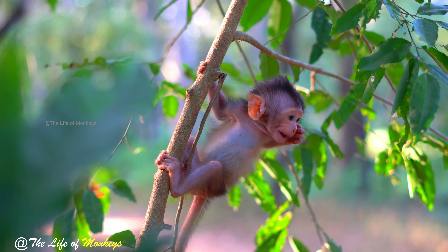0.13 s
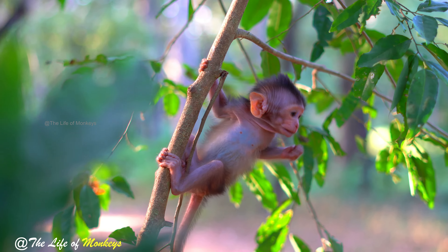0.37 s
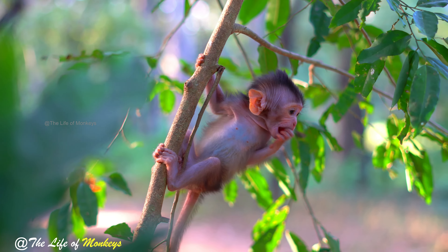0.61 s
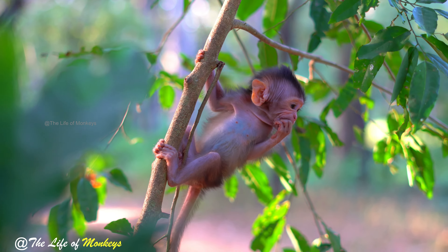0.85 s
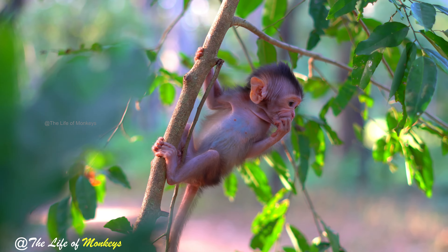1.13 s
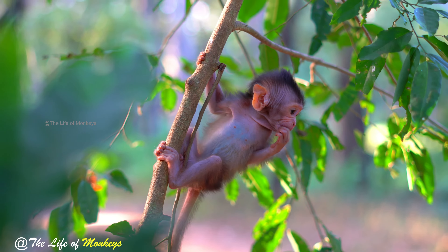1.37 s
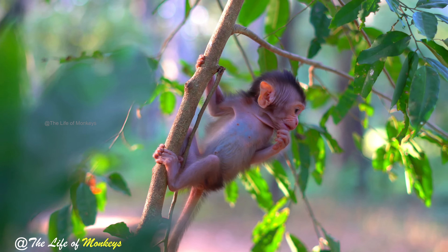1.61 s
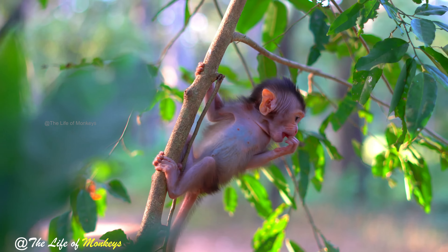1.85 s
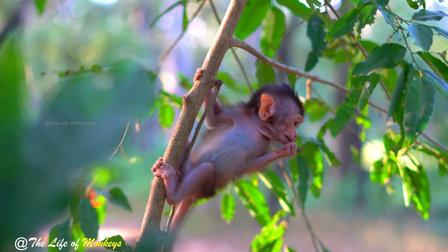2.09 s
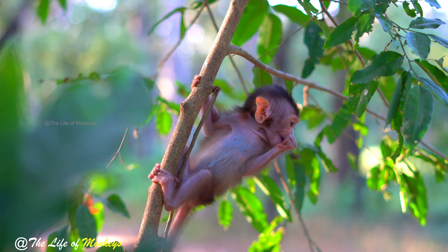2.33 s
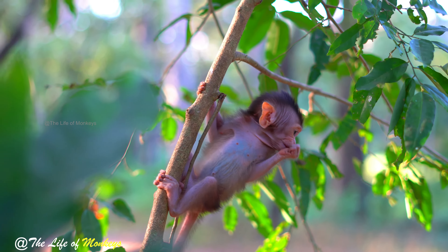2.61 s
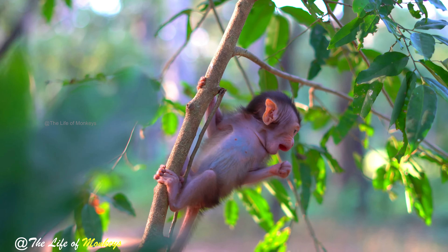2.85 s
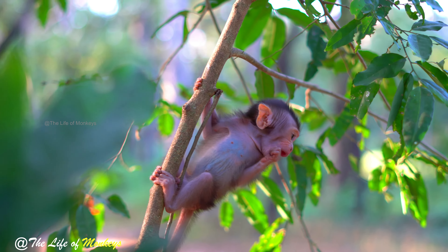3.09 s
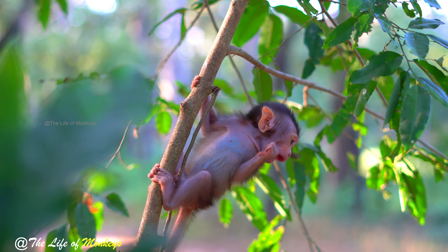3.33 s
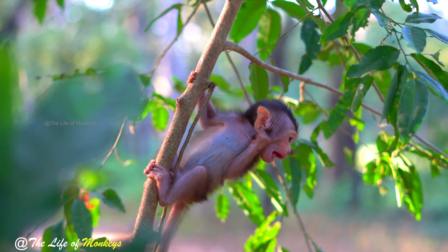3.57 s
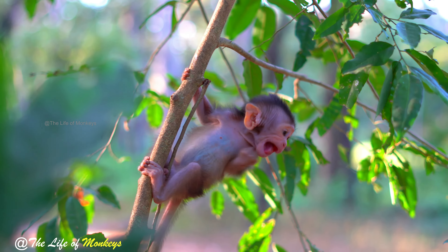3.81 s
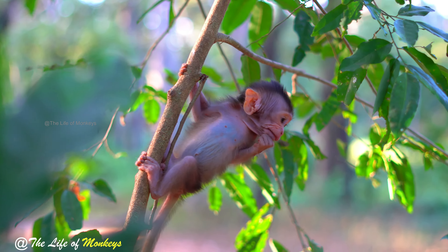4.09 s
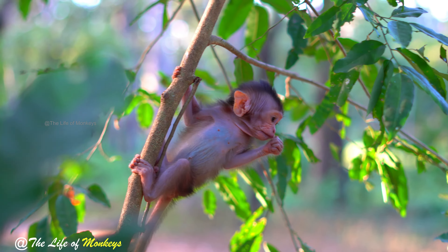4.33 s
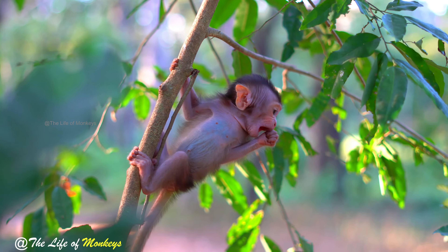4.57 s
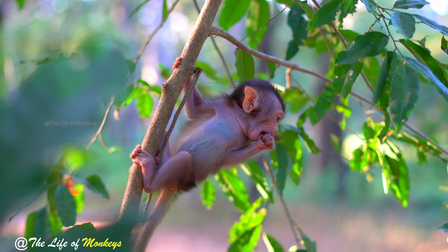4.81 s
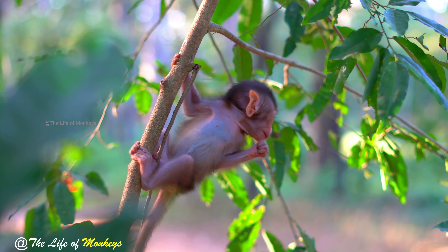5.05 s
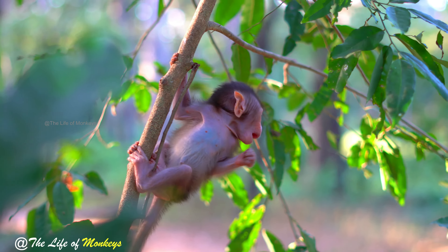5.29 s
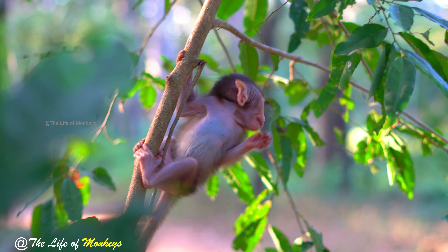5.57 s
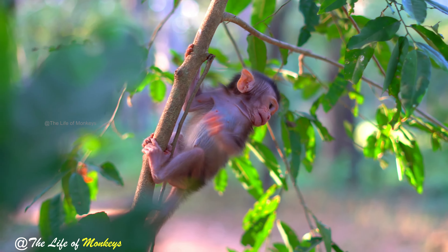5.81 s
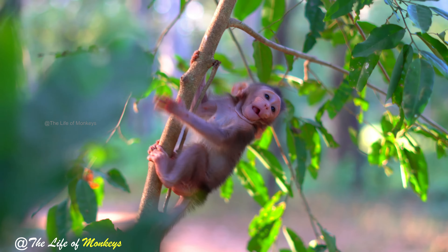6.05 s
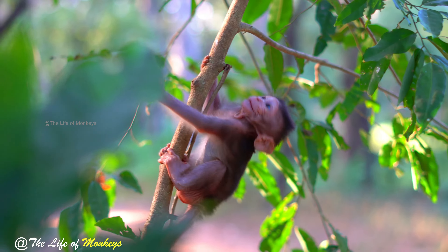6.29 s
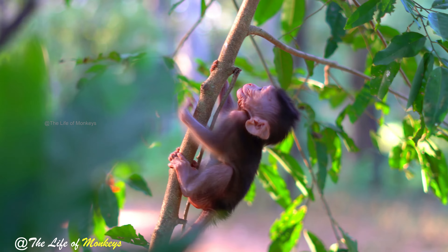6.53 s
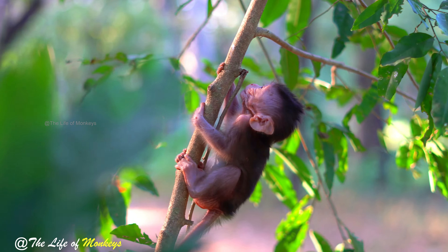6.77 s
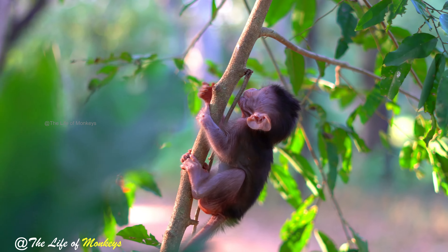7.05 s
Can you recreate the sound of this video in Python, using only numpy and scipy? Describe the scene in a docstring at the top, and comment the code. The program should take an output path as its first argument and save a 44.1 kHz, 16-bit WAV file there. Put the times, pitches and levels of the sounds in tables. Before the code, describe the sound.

Outdoors in a forest, two cicadas sing throughout with a steady, shrill, metallic drone, one clearly left, one nearer the middle. Their tones throb in short pumps and twice per roughly one-second figure flare brighter. A blurred far chorus and low airy rumble lie beneath. In the first half, leaves rustle softly and twigs tick as a small animal moves; a faint hoot and one tiny chirp pass. Stereo microphone at some distance, with woodland echoes.

```python
"""Two cicadas drone in a forest, each a train of some 543 clicks a second built from its overtones. Each repeats
a figure: the pitch rises and sags, the tone swells in short pumps, and twice the bright overtones flare.
A far chorus of noise humps and an airy rumble of shaped noise lie under them; leaf rustles are clumps
of grains, twig ticks short damped rings, a faint hoot and one small chirp gliding sines."""
import sys
import numpy as np
from scipy import signal
from scipy.fft import rfft, irfft, next_fast_len
from scipy.io import wavfile

SR = 44100
rng = np.random.default_rng(int(sys.argv[2]) if len(sys.argv) > 2 else 0)


def voltage_ratio(decibels):
    """Convert decibels (scalar or array-like) to amplitude ratios, 20 dB per decade."""
    exponent = np.asarray(decibels, float) / 20
    return 10 ** exponent


def waveform_to_disk(signal):
    """Save audio, clipped to [-1, 1], as 16-bit WAV at the path in sys.argv[1]."""
    frames = np.transpose(np.atleast_2d(signal))
    scaled = np.clip(frames, -1, 1) * 32767
    samples = np.round(scaled).astype(np.int16)
    wavfile.write(sys.argv[1], SR, samples)


N = 315756   # samples in the scene


def at_hz(points, hz, axis=1):
    """A column of a table, read on a log-frequency axis."""
    points = np.array(points)
    return np.interp(np.log(hz), np.log(points[:, 0]), points[:, axis])


def pan(sound, left_right_db):
    """One sound placed between the sides; positive dB leans left."""
    return sound * voltage_ratio([[left_right_db / 2], [-left_right_db / 2]])


def drift(rate_hz, size):
    """Random wander of spread 1: white noise smoothed by two equal low-pass poles at rate_hz."""
    knot_rate = 400   # knots per second
    knots = rng.standard_normal(int(size / SR * knot_rate))
    pole = np.exp(-2 * np.pi * rate_hz / knot_rate)
    slow = signal.lfilter([1], [1, -2 * pole, pole * pole], knots)
    return np.interp(np.arange(size) * knot_rate / SR, np.arange(len(slow)), slow / slow.std())


def coloured(gain):
    """Stereo noise of rms 1 with the given gain per frequency; the two sides agree most in the bass."""
    # left-right likeness of the noise: (f/Hz, likeness from 0 to 1)
    side_likeness = [(60, 0.99), (130, 0.98), (290, 0.67), (640, 0.22), (1410, 0.51), (3100, 0.1),
                     (15000, 0.14)]
    hz = np.maximum(np.arange(len(gain)) * SR / N, 1)
    alike = np.clip(at_hz(side_likeness, hz), 0, 1)
    mid, side = rfft(rng.standard_normal((2, N))) * gain * np.sqrt([1 + alike, 1 - alike])
    noise = irfft([mid + side, mid - side], N)
    return noise / noise.std()


def glide(rows, wobble_hz):
    """A sine that follows rows of (t/s, f/Hz, level/dB), its pitch trembling, and is silent outside them."""
    times, hz, db = np.transpose(rows)
    t = np.arange(N) / SR
    pitch = np.interp(t, times, hz) + wobble_hz * drift(8.2, N)
    phase = 2 * np.pi * np.cumsum(pitch) / SR
    return voltage_ratio(np.interp(t, times, db, -200, -200)) * np.sqrt(2) * np.sin(phase)


def swells(share, rows, rest_db):
    """Gain over one figure: bells (share of the figure, level/dB, spread as share) on a resting level."""
    places = np.arange(400) / 400
    gain = voltage_ratio(rest_db)
    for at, db, spread in rows:
        distance = (places - at + .5) % 1 - .5   # the figure closes on itself
        gain = gain + voltage_ratio(db) * np.exp(-.5 * (distance / spread) ** 2)
    return np.interp(share, places, gain, period=1)


def through_forest(voice, singer, left_lag_us, run_in):
    """Adds to the straight sound a decaying scatter from trunks and leaves, both in the singer's colour."""
    # brightness of the scatter: (f/Hz, echo level re straight sound/dB)
    echo_colour = [(2700, 0), (5400, 1), (8000, 1), (11000, -0.5), (19000, -9)]
    t60_s, echo_left_db = 0.91, 7.5   # the echoes come mostly from the left
    size = next_fast_len(len(voice) + SR)
    hz = np.maximum(np.arange(size // 2 + 1) * SR / size, 1)
    lag = np.arange(SR) / SR
    scatter = rng.standard_normal((2, SR)) * voltage_ratio(-60 * lag / t60_s) * np.minimum(lag / 0.03, 1)
    scatter /= np.sqrt((scatter ** 2).sum(axis=1, keepdims=True))
    straight = voltage_ratio(np.outer([.5, -.5], at_hz(singer, hz, axis=2)))
    straight = straight * np.exp(-2j * np.pi * np.outer([left_lag_us / 10 ** 6, 0], hz))
    echo = pan(voltage_ratio(at_hz(echo_colour, hz)) * rfft(scatter, size), echo_left_db)
    heard = rfft(voice, size) * voltage_ratio(at_hz(singer, hz)) * (straight + echo)
    return irfft(heard, size)[:, run_in:run_in + N]


def cicada(pitch, pumps, flares, starts, singer, jitter_hz, rest_db, low_follows, treble_swing, left_lag_us):
    """Sums the overtones of one click train; pumps and flares move groups of overtones by different amounts."""
    # every fifth overtone is strong, as five ribs buckle per click: (multiple of click rate, relative level/dB)
    overtones = [(4, -37.5), (5, -7), (5.5, -30.5), (6, -27.5), (6.5, -45), (7, -35.5), (8, -32),
                 (9, -32.5), (10, -2), (10.5, -33.5), (11, -20.5), (11.5, -40), (12, -25), (12.5, -37),
                 (13, -28), (13.5, -57), (14, -27), (15, -9.5), (15.5, -33), (16, -24), (16.5, -47),
                 (17, -29), (18, -34), (19, -30), (20, -14), (20.5, -39), (21, -29.5), (22, -35), (23, -34),
                 (24, -35), (25, -21.5), (26, -32), (27, -39), (29, -33), (30, -9), (31, -33), (34, -26),
                 (35, -10.5)]
    # effort of either singer: (t/s, gain/dB)
    effort = [(0, -2), (.7, -0.86), (1.8, -0.5), (2.6, -2), (3.3, -1.5), (4.2, -1.1), (5.5, -0.5),
              (7.2, -0.8)]
    click_hz = 543
    pump_spread = 0.023   # share of the figure
    run_in = SR   # samples sung before the start, so that the echoes are built up
    t = np.arange(-run_in, N) / SR
    share = np.interp(t, starts, np.arange(len(starts))) % 1
    offset = np.interp(share, *np.transpose(pitch), period=1)
    pump = swells(share, [(at, db, pump_spread) for at, db in pumps], rest_db)
    flare = swells(share, flares, rest_db=-29)
    click_rate = click_hz + offset + jitter_hz * drift(23.93, len(t))
    phase = 2 * np.pi * np.cumsum(click_rate) / SR

    low, middle, upper, high, top = groups = np.zeros((5, len(t)))
    for (order, db), turn in zip(overtones, rng.uniform(0, 2 * np.pi, 64)):
        group = np.searchsorted([8, 13, 18, 28], order, side="right")
        groups[group] += voltage_ratio(db) * np.cos(order * phase + turn)
    # the pumps move the low overtones less than the middle ones; the flares move the higher groups
    voice = low * pump ** low_follows + middle * pump + upper * flare ** 0.39
    voice += high * flare ** treble_swing + top * flare ** 0.51
    voice *= voltage_ratio(np.interp(t, *np.transpose(effort)))
    return through_forest(voice, singer, left_lag_us, run_in)


def left_cicada():
    """A singer on the left whose click-train figure returns at an even pace."""
    # click rate through one figure: (share of the figure, offset/Hz)
    left_pitch = [(.04, 4), (.13, 1), (.17, 1.74), (.28, -2), (.35, 3), (.47, -1.5), (.67, 4), (.79, 0.24),
                  (.865, 5), (.95, 1.28)]
    # pumps that swell the tone: (share of the figure, level/dB)
    left_pumps = [(0.038, -0.5), (.165, -18), (.365, -6.8), (0.549, -6), (0.669, -3.2), (.875, -4.1)]
    # flares of the treble: (share of the figure, level/dB, spread as share)
    left_flares = [(.09, -17, 0.033), (.265, 5, 0.035), (.42, -22, .02), (.76, 8.5, 0.034)]
    # colour and place: (f/Hz, level/dB, left-right of the straight sound/dB)
    left_singer = [(2690, -26, 20.5), (5530, -20.5, 21.5), (7100, -26, 0), (11300, -29.5, 20.5),
                   (19000, -20.5, 2)]
    start_s, period_s = .015, .954
    starts = start_s + period_s * np.arange(-2, 10)
    return cicada(left_pitch, left_pumps, left_flares, starts, left_singer, jitter_hz=0.33, rest_db=-13,
                  low_follows=0.17, treble_swing=0.72, left_lag_us=41.0)


def front_cicada():
    """A singer nearer the middle whose click-train figure is shorter and slightly uneven in length."""
    # times at which the figure begins again: t/s
    front_starts = [-.799, -.115, .569, 1.268, 1.957, 2.646, 3.285, 3.964, 4.653, 5.347, 6.051, 6.745,
                    7.429]
    # click rate through one figure: (share of the figure, offset/Hz)
    front_pitch = [(.02, 2.5), (.14, -1.84), (.29, -3), (.38, -0.49), (.5, -1.62), (.63, -4), (.75, -4.5),
                   (.83, -6.5), (.9, -1.5)]
    # pumps that swell the tone: (share of the figure, level/dB)
    front_pumps = [(.005, 1), (.22, 5.3), (.36, 5.9), (.495, 4.8), (.59, 1.1), (0.669, 0.73), (.815, 5.1),
                   (.92, 5.1)]
    # flares of the treble: (share of the figure, level/dB, spread as share)
    front_flares = [(0.051, 3, 0.052), (.19, -5, 0.054), (.38, -11, 0.062), (0.567, 7.5, 0.038),
                    (.85, -16, 0.081)]
    # colour and place: (f/Hz, level/dB, left-right of the straight sound/dB)
    front_singer = [(2750, -31, 10.4), (5490, -30, 7.3), (7700, -22, 4.1), (11400, -22, 5.9),
                    (19000, -23, 4.5)]
    earlier = 2 * front_starts[0] - front_starts[1]   # one more figure for the run-in
    # a negative low_follows makes the low overtones move against the pumps
    return cicada(front_pitch, front_pumps, front_flares, [earlier] + list(front_starts), front_singer,
                  jitter_hz=0.336, rest_db=-9.5, low_follows=-0.28, treble_swing=0.7, left_lag_us=19.3)


def chorus():
    """Many far singers of slightly lower pitch blur into humps of noise, steeper for the higher multiples."""
    # spread of the lowest strong overtone: (f/Hz, relative density/dB per Hz)
    hump = [(2150, -39), (2300, -25), (2450, -6.5), (2560, -5.5), (2610, -1), (2625, 1.5), (2640, -2.5),
            (2690, -2.5), (2780, -6), (2860, -10.5), (3000, -22), (3100, -26)]
    # its multiples: (multiple, mean level/dB, left-right/dB)
    hump_multiples = [(1, -41.5, .1), (2, -40.5, 3.3), (3, -48, 1.8), (4, -50, 1)]
    hz = np.maximum(np.arange(N // 2 + 1) * SR / N, 1)
    skirted = [(1, -120)] + list(hump) + [(SR, -120)]
    blur = np.zeros((2, N))
    for multiple, db, side_db in hump_multiples:
        shape_db = at_hz(skirted, hz / round(multiple)) * multiple ** 0.34
        wavering = voltage_ratio(db + 0.98 * drift(3.4, N))
        blur += pan(wavering * coloured(voltage_ratio(shape_db)), side_db)
    return blur


def air():
    """Forest air and distant rumble: shaped noise, its level wavering a little."""
    # colour of the noise: (f/Hz, relative density/dB per Hz)
    air_colour = [(15, -40), (25, -20), (45, -1), (66, -4), (102, -1), (150, -4.5), (172, -16),
                  (199, -16.5), (335, -17.5), (700, -21), (1400, -25.5), (2100, -24.5), (4000, -25.5),
                  (7000, -28), (10000, -29), (14000, -21), (20000, -64)]
    mean_db, waver_db = -42, 1.0
    hz = np.maximum(np.arange(N // 2 + 1) * SR / N, 1)
    return voltage_ratio(mean_db + waver_db * drift(1.7, N)) * coloured(voltage_ratio(at_hz(air_colour, hz)))


def rustles():
    """Leaves rustle as clumps of uneven band-passed grains, a little to the right."""
    # clumps: (t/s, length/s, level at the middle before panning/dB)
    clumps = [(0.52, 0.054, -42.5), (1.336, 0.058, -40.5), (1.922, 0.11, -39), (2.033, 0.11, -39),
              (2.144, 0.092, -46), (2.757, 0.056, -53), (3.03, 0.12, -46), (3.506, 0.048, -44.5)]
    grains_per_s = 2500
    t = np.arange(N) / SR
    swell = sum(voltage_ratio(db) * np.sin(np.pi * np.clip((t - s) / length, 0, 1)) for s, length, db in clumps)
    strikes = rng.random((2, N)) < grains_per_s / SR
    unevenness = voltage_ratio(2.9 * rng.exponential(1, (2, N)).clip(0, 4))
    grains = strikes * rng.standard_normal((2, N)) * unevenness
    band = signal.butter(1, [400, 4200], "band", fs=SR, output="sos")
    grains = signal.sosfilt(band, grains + 1e-18)
    return swell * grains / grains.std() * voltage_ratio([[-1.0], [1.5]])


def ticks():
    """A twig's click rings a short wooden mode for a few cycles."""
    # ticks: (t/s, ring level before decay/dB, ring f/Hz, left-right/dB, crack level/dB)
    twigs = [(.544, -29, 1500, -.5, -44), (.589, -43, 1600, -2, -44), (1.961, -28, 376, 1, -44),
             (2.783, -52, 630, 10, -18), (3.107, -24, 1840, -16, -32), (3.348, -26, 1010, -.5, -46),
             (3.475, -22, 1860, 6, -46), (3.535, -24.5, 400, 2, -46)]
    out, t = np.zeros((2, N)), np.arange(2000) / SR
    for s, db, hz, side_db, crack_db in twigs:
        cycles = t * hz
        decay = voltage_ratio(db - 60 * cycles / 8.2)   # falls 60 dB in 8.2 cycles
        ring = np.sin(2 * np.pi * cycles) * decay * np.minimum(cycles / 0.88, 1)
        ring[:7] += voltage_ratio(crack_db) * np.hanning(7) ** 2   # the crack of first contact
        start = round(s * SR)
        out[:, start:start + len(t)] += pan(ring, side_db)
    return out


def hoot():
    """A faint gliding sine from far, its level fluttering, blurred by echoes."""
    # path of the hoot: (t/s, f/Hz, level before the flutter/dB)
    hoot_path = [(.75, 640, -83), (.9, 645, -60), (1.05, 654, -60), (1.2, 702, -70), (1.35, 708, -57),
                 (1.6, 727, -61), (1.7, 720, -85)]
    flutter = 0.83 + 0.7 * drift(25.6, N)
    return glide(hoot_path, wobble_hz=4.2) * flutter


def chirp():
    """One small chirp: a sine that rises briefly and falls, to the left."""
    # path of the chirp: (t/s, f/Hz, level before panning/dB)
    chirp_path = [(3.425, 6800, -62), (3.432, 7100, -35), (3.445, 6300, -41), (3.458, 4570, -39),
                  (3.466, 3840, -53)]
    return pan(glide(chirp_path, wobble_hz=22.8), 6.0)


def scene():
    """All sources at their places."""
    singers = left_cicada() + front_cicada()
    background = chorus() + air()
    return singers + background + rustles() + ticks() + hoot() + chirp()


def straight_line_resampling(dry):
    """Brought to 48 kHz, then read on straight lines: every tone gains a faint twin 3.9 kHz lower."""
    fine_rate = 48000   # Hz
    padded = 147 * 2160   # a length that converts to a whole number of samples
    fine = irfft(rfft(dry, padded), padded * fine_rate // SR) * fine_rate / SR
    read = np.arange(N) * fine_rate / SR
    return np.array([np.interp(read, np.arange(len(side)), side) for side in fine])


def band_limit(x):
    """A steep low-pass at the top of the band."""
    return signal.sosfilt(signal.butter(12, 15560, fs=SR, output="sos"), x)


def record(dry):
    """Straight-line resampling, then a steep low-pass that ends the treble at 15.48 kHz."""
    coarse = straight_line_resampling(dry)
    low_pass = signal.ellip(10, .5, 70, 15480, fs=SR, output="sos")
    finished = signal.sosfilt(low_pass, coarse)
    return band_limit(finished)


dry = scene()
out = record(dry)
waveform_to_disk(out)
```